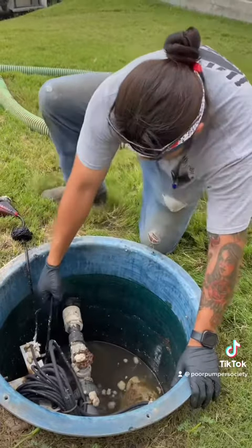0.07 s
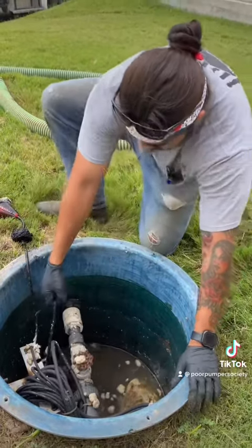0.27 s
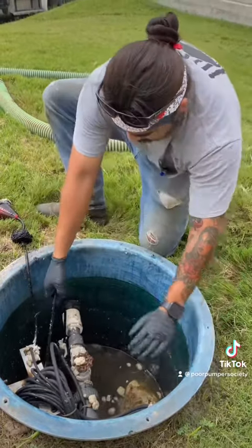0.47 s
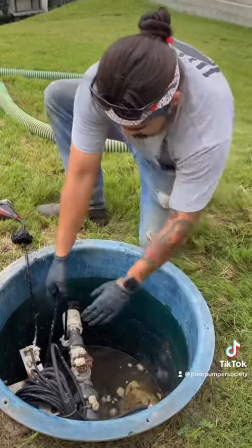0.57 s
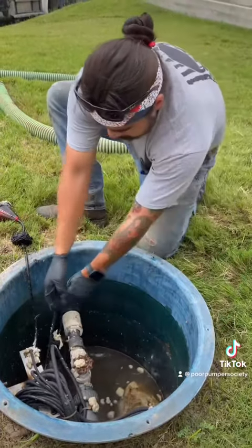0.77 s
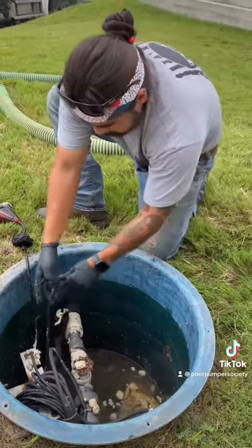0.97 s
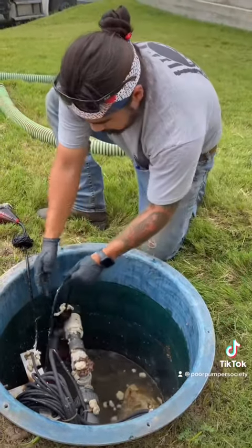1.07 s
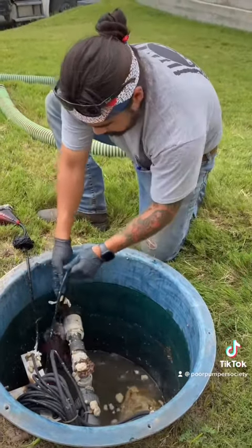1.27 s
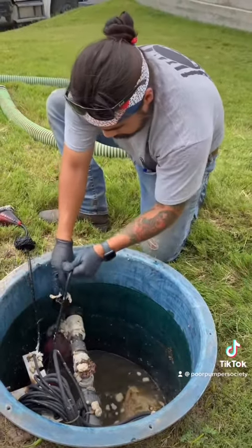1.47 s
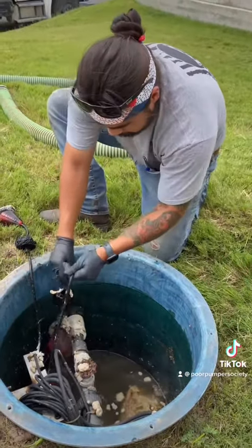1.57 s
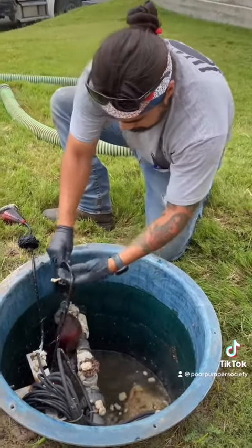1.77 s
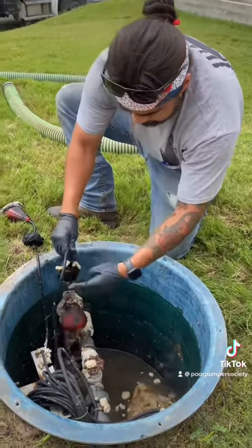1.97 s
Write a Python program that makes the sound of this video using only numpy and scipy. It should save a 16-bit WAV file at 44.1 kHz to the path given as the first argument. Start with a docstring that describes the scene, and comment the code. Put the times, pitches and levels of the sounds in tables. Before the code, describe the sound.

Continuous low pump hum and diesel throb heard across a lawn by a stereo phone, with grainy air rush, light repeating clatter and faint high whines; near the end one very brief soft burble slips through.

```python
"""A rotary vane vacuum pump runs on a truck across a lawn, driven by a fast-idling diesel engine. Six vanes
pulse the exhaust as sines on shaft multiples; the housing repeats one turn of noise as clatter. The engine adds
its firing rate and octave; steady whines sit on top; filtered noise makes muffler roar and rush. A short burble
of three brief tones comes late, and the thin top whine stops during it. A phone with two microphone ports
stands across the lawn and hears the bass louder on the right."""
import sys
import numpy as np
from scipy import signal
from scipy.fft import rfft, irfft
from scipy.io import wavfile
from scipy.ndimage import uniform_filter1d

SR = 44100
rng = np.random.default_rng(int(sys.argv[2]) if len(sys.argv) > 2 else 0)


def transcribe(signal):
    """Save signal, clipped to [-1, 1], as a 16-bit WAV file at the path in sys.argv[1]."""
    frames = np.atleast_2d(signal).T
    limited = np.clip(frames, -1, 1)
    pcm = np.round(limited * 32767).astype(np.int16)
    wavfile.write(sys.argv[1], SR, pcm)


def natural_amplitude(level_db):
    """Convert a level in decibels to a linear amplitude factor, elementwise."""
    exponent = np.asarray(level_db, float) / 20
    return 10 ** exponent


N = 89126

# how fast tones waver: pitch_hz, changes_per_s
TONE_WAVER_RATE = [(95, 7), (250, 9), (700, 13), (3400, 24), (8400, 8)]
# level unrest of tones: pitch_hz, spread_db
TONE_LEVEL_UNREST = [(45, 2), (90, .5), (100, .5), (190, 2), (250, 3), (700, 3.5), (3400, 3.5), (8400, 1.5)]
# phase unrest of tones: pitch_hz, spread_cycles
TONE_PHASE_UNREST = [(95, .01), (300, .05), (700, .1), (1600, .1), (3400, .14), (8400, .05)]
# multiples of the shaft speed that stand out: multiple
SHAFT_MULTIPLES = [3, 5, 6, 12, 16, 17, 18, 21, 23, 24, 38, 40, 42, 43, 44, 45, 46, 54, 63, 72, 90, 102,
                   108, 120, 126, 132, 198, 210, 216, 418, 448]
# rms level of each of those multiples, the vane hum before its unevenness: level_db
SHAFT_MULTIPLE_LEVELS = [-55, -48, -30, -38.5, -44, -51, -45, -54, -53, -52, -59, -60, -63, -55, -59, -63,
                         -62, -66, -62, -63, -64, -60, -62, -62, -60, -63, -64, -58.5, -57.5, -76, -78]
# uneven level of the hum near 95 Hz, with deeper dips at some beats: time_s, gain_db
VANE_HUM_UNEVENNESS = [(0, 0), (.1, 1.5), (.16, 0), (.215, 2.5), (.33, -4), (.45, .8), (.53, 1.2), (.58, 0),
                       (.68, 2), (.74, -1), (.795, 2), (.85, -3), (.95, -2), (1.09, 1.8), (1.15, -1.6),
                       (1.24, .4), (1.32, .8), (1.4, -.7), (1.53, 1.6), (1.68, -1.6), (1.8, 2), (1.88, -.8),
                       (2.02, .5)]
# rms of the engine's firing rate, then of its octave: level_db
FIRING_LEVELS = [-49, -41]
# tones off the shaft series; the lowest sits at the sum of shaft multiple 5 and the engine octave, the rest
# perhaps gears and turbo: pitch_hz, level_db (rms before any fades)
STEADY_WHINES = [(169.6, -48), (710.7, -58), (3466, -60), (3499, -59), (3531, -62)]
# brightening and fading of the whines near 3.5 kHz: time_s, gain_db
WHINE_FADES = [(0, 1), (.2, 4), (.38, 3.5), (.52, 1.5), (.62, -4.5), (1.1, 0.5), (1.25, -7), (1.45, 1),
               (1.6, -1), (1.78, 0), (2.02, 0)]
# muffler roar spectrum, relative: pitch_hz, density_db_per_hz
ROAR_SPECTRUM = [(20, -25), (35, -19), (50, -12), (65, -10), (80, -3.5), (88, -9), (104, -9), (112, 0.5),
                 (125, 2.5), (175, -5), (250, -0.5), (300, -6), (390, -9.5), (430, -23), (520, -23.5),
                 (700, -78.5)]
# spectrum of escaping air and engine rush, relative: pitch_hz, density_db_per_hz
RUSH_SPECTRUM = [(120, -60.5), (250, -21.5), (420, -8.5), (551, -6), (691, -0.5), (907, -6.5), (1010, -4.5),
                 (1260, -8), (1400, -5), (1750, -7), (1850, -5), (2050, -5), (2530, -11.5), (3180, -8.5),
                 (3330, -9), (3440, -3.5), (3560, -9), (3700, -11), (4000, -14.5), (6300, -19), (7700, -24),
                 (8050, -36), (8600, -43), (9200, -74), (10000, -80), (11000, -62), (11500, -38.5),
                 (12600, -27.5), (13300, -31.5), (15500, -35.5)]
# sag and return of the topmost hiss: time_s, gain_db
TOP_HISS_FADES = [(0, 2), (0.101, 0.5), (0.551, -8), (0.699, 0), (1.2, 1), (1.4, -0.5), (2.02, 1.5)]
# short burble, perhaps liquid in the tank: peak_s, pitch_hz, level_db (rms of the tone before its bell)
BURBLE_TONES = [(1.53, 1030, -52), (1.563, 990, -49.5), (1.567, 890, -50.5)]
# balance of the two microphone ports: pitch_hz, left_minus_right_db
PORT_BALANCE = [(25, -4), (45, -4), (95, -2), (130, -4.5), (200, -8), (400, -9), (700, -7), (900, -1),
                (1200, 3), (1900, 4), (2500, 0), (3400, -4), (5000, -1), (7000, 0), (13000, 1)]
# likeness of the two microphone ports: pitch_hz, likeness_0_to_1
PORT_LIKENESS = [(25, 0.9), (95, 0.91), (140, 0.89), (300, 0.89), (450, 0.67), (560, 0.16), (1950, 0.26),
                 (2100, 0.85), (2600, 1), (3600, 0.84), (3900, 0.54), (6000, 0.5), (6300, 0.96),
                 (11800, 0.88), (12200, 0.5)]

SHAFT_HZ, VANES = 15.937, 6
FIRING_HZ = 45.0
BEAT_DIP_S = .33  # vane tone and engine octave nearly oppose here, then about every 1 / 5.6 s
THIN_WHINE_ENDS_S = 1.57


def read(table, hz):
    """Table value at hz, straight on a log-frequency axis."""
    points = np.array(table, float)
    return np.interp(np.log(np.maximum(hz, 1)), np.log(points[:, 0]), points[:, 1])


def gain_over_time(table, t):
    """Gain in dB at each time, straight between the table's points."""
    return np.interp(t, *np.array(table).T)


def level(x, db):
    """Scale so that the mean of the channels has this rms."""
    return x * natural_amplitude(db) / np.sqrt(np.mean(x.mean(axis=0) ** 2))


def walk(rate_hz):
    """Random levels held 1 / rate s and slewed twice; mean 0, spread 1."""
    hold = int(SR / rate_hz)
    steps = np.repeat(rng.standard_normal(N // hold + 2), hold)
    smooth = uniform_filter1d(uniform_filter1d(steps, hold), hold)[:N]
    return (smooth - smooth.mean()) / smooth.std()


def ports(hz):
    """Left and right microphone gains whose mean is 1."""
    ratio = natural_amplitude(read(PORT_BALANCE, hz))
    return np.array([2 * ratio / (1 + ratio), 2 / (1 + ratio)])


def tone(turns, hz, db, start=None):
    """A sine wavering in level and phase; the ports differ in phase where they are unlike."""
    chance, lag = rng.random(2)
    lag = (lag - .5) * (1 - np.clip(read(PORT_LIKENESS, hz), 0, 1)) / 2
    rate_hz = read(TONE_WAVER_RATE, hz)
    drift = read(TONE_PHASE_UNREST, hz) * walk(rate_hz)
    first_phase = chance if start is None else start  # cycles
    wave = np.sin(2 * np.pi * (turns + drift + first_phase + np.array([[lag], [-lag]])))
    waver = natural_amplitude(read(TONE_LEVEL_UNREST, hz) * walk(rate_hz))
    envelope = np.sqrt(2) * natural_amplitude(db) * waver / np.sqrt(np.mean(waver ** 2))
    return envelope * ports(hz)[:, None] * wave


def colour(source, table):
    """Stereo spectrum from three unrelated signals: one shared, one for each port."""
    hz = np.fft.rfftfreq(N, 1 / SR)
    shared, left, right = rfft(source, axis=1)
    like = np.clip(read(PORT_LIKENESS, hz), 0, 1)
    pair = np.sqrt(like) * shared + np.sqrt(1 - like) * np.array([left, right])
    return hz, pair * ports(hz) * natural_amplitude(read(table, hz))


def airflow(source, table, db):
    """Noise in overlapping bands that share a slow swell; each also wavers alone, giving a streaky grain."""
    swell_db, swell_hz = 0.4, 0.98
    flicker_db, flicker_hz = 1.6, 9.95
    top_hiss_from_hz, edge_hiss_from_hz = 10000, 8000
    edge_hiss_db = 9  # hiss around the thin whine grows as that whine stops
    t = np.arange(N) / SR
    hz, pair = colour(source, table)
    swell = walk(swell_hz)
    top_db = gain_over_time(TOP_HISS_FADES, t)
    edge_db = edge_hiss_db * np.clip((t - THIN_WHINE_ENDS_S) / .03 + 1, 0, 1)
    place = 8 * np.log2(np.maximum(hz, 1) / 20)  # eighth-octaves above 20 Hz
    last_band = int(read([(20, 0), (20480, 80)], table[-1][0])) + 1
    out = 0
    for step in range(last_band + 1):
        window = np.cos(np.clip(place - step, -1, 1) * np.pi / 2) ** 2
        band = irfft(pair * window, N, axis=1)
        centre_hz = 20 * 2 ** (step / 8)
        shift_db = top_db if centre_hz > top_hiss_from_hz else edge_db * (centre_hz > edge_hiss_from_hz)
        out = out + band * natural_amplitude(swell_db * swell + flicker_db * walk(flicker_hz) + shift_db)
    return level(out, db)


def shaft_rotation(t):
    """Running count of shaft turns at a slightly wobbling speed, zero at the beat dip."""
    wobble = .0003  # spread, share of the shaft speed
    turns = np.cumsum(SHAFT_HZ * (1 + wobble * walk(2))) / SR
    return turns - np.interp(BEAT_DIP_S, t, turns)


def pump_hum(t, turns):
    """Vanes and shaft sound at whole multiples of the shaft speed; the hum near 95 Hz is uneven in level."""
    out = 0
    for multiple, db in zip(SHAFT_MULTIPLES, SHAFT_MULTIPLE_LEVELS):
        is_vane_tone = multiple == VANES
        start = 0 if is_vane_tone else None
        unevenness = natural_amplitude(is_vane_tone * gain_over_time(VANE_HUM_UNEVENNESS, t))
        out = out + tone(multiple * turns, multiple * SHAFT_HZ, db, start) * unevenness
    return out


def diesel_firing(t):
    """The engine's firing rate and its octave, whose beat with the vane tone dips the level."""
    out = 0
    for k, db in enumerate(FIRING_LEVELS):
        hz = (k + 1) * FIRING_HZ
        out = out + tone(hz * (t - BEAT_DIP_S), hz, db, 0.45)
    return out


def whines(t):
    """Sines at fixed pitches off the shaft series; those above 3 kHz brighten and fade."""
    out = 0
    for hz, db in STEADY_WHINES:
        out = out + tone(hz * t, hz, db) * natural_amplitude((hz > 3000) * gain_over_time(WHINE_FADES, t))
    return out


def thin_whine(t):
    """One faint high sine that stops with a fade of 21 ms."""
    pitch_hz, level_db = 8441, -72  # rms before the stop
    fade = np.clip((THIN_WHINE_ENDS_S - t) / 0.021, 0, 1)
    return tone(pitch_hz * t, pitch_hz, level_db) * fade


def muffler_roar():
    """Air through the muffler: gently wavering noise with the roar spectrum."""
    return airflow(rng.standard_normal((3, N)), ROAR_SPECTRUM, -32)  # dB rms


def clatter(turns):
    """The housing's knocks: one turn of random knocks, played again on every turn."""
    size = int(SR / SHAFT_HZ)
    pattern = rng.standard_normal((3, size))
    return pattern[:, (turns % 1 * size).astype(int)]


def air_rush(turns):
    """Escaping air throbs with the vanes and every second vane; clatter shares its spectrum."""
    pulse = .04  # depth of each throb
    clatter_db = -6.5  # against the air noise
    vane_throb = np.cos(2 * np.pi * VANES * turns)
    second_vane_throb = np.cos(np.pi * VANES * turns)
    throb = 1 + pulse * (vane_throb + second_vane_throb)
    source = throb * rng.standard_normal((3, N)) + natural_amplitude(clatter_db) * clatter(turns)
    return airflow(source, RUSH_SPECTRUM, -41)  # dB rms


def burble(t):
    """Brief tones under bell-shaped envelopes, perhaps liquid in the tank."""
    half_length_s = 0.014
    out = 0
    for peak_s, hz, db in BURBLE_TONES:
        out = out + tone(hz * t, hz, db) * np.exp(-((t - peak_s) / half_length_s) ** 2)
    return out


def scene():
    """Pump, engine, whines, roar, rush and burble, summed as the two ports hear them."""
    t = np.arange(N) / SR
    turns = shaft_rotation(t)
    machine = pump_hum(t, turns) + diesel_firing(t) + whines(t) + thin_whine(t)
    return machine + muffler_roar() + air_rush(turns) + burble(t)


def low_pass(x):
    """Removes everything above the highest recorded frequency."""
    return signal.sosfilt(signal.butter(12, 15650, fs=SR, output="sos"), x)


def record(dry):
    """The phone stores the two-port mix."""
    return low_pass(dry)


dry = scene()
out = record(dry)
transcribe(out)
```